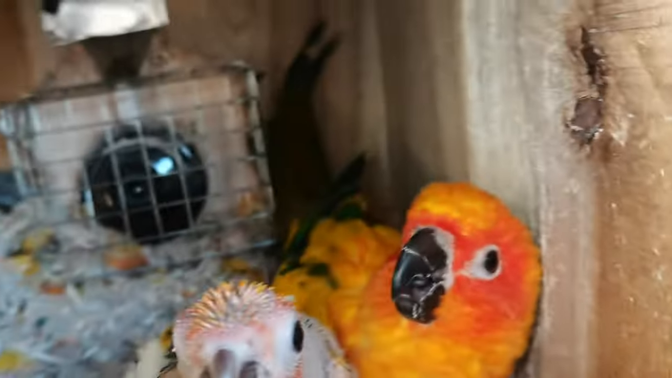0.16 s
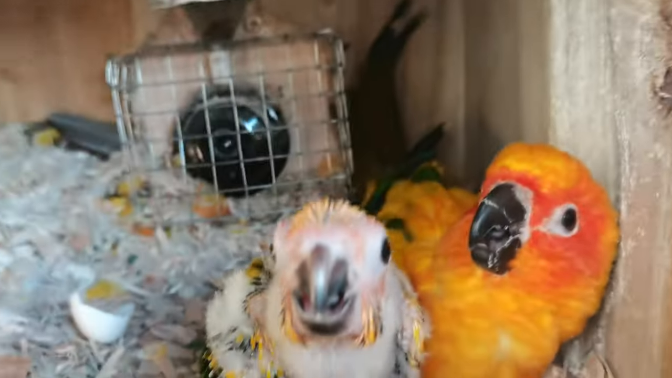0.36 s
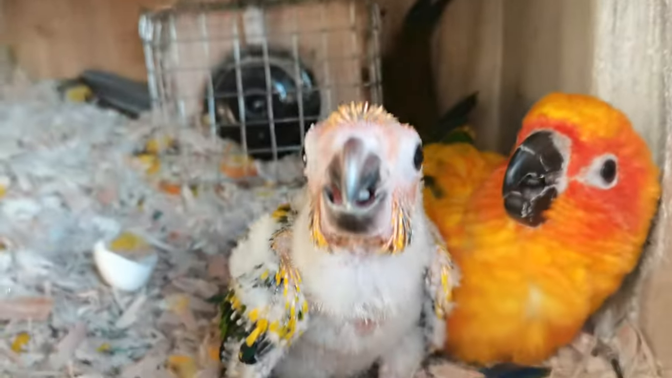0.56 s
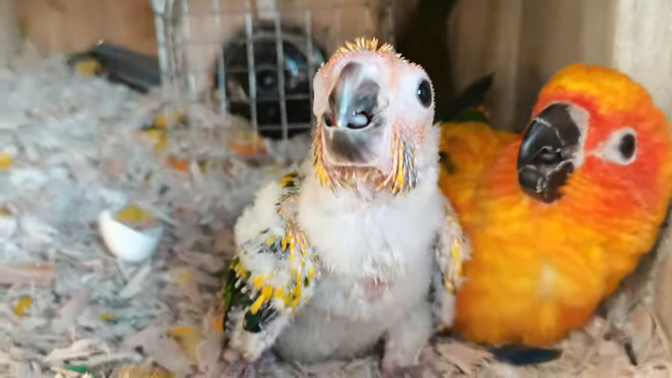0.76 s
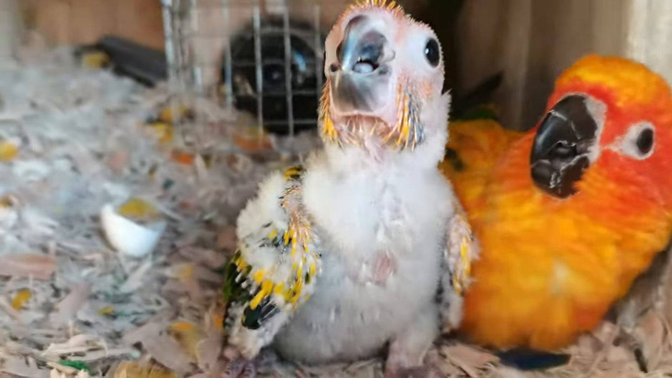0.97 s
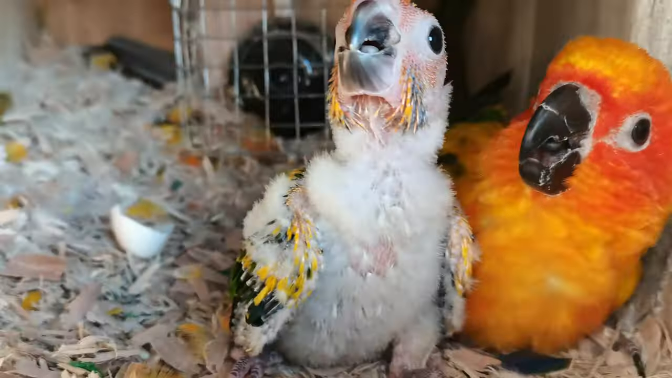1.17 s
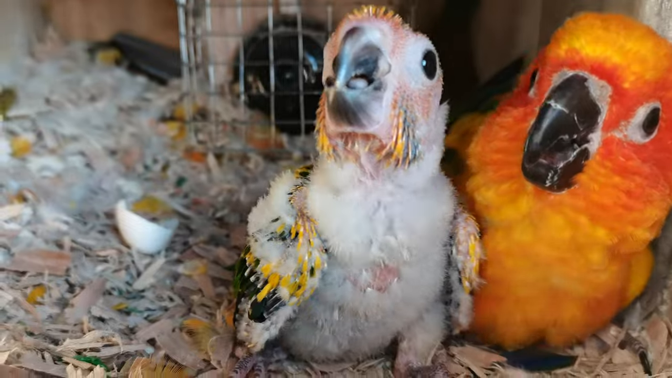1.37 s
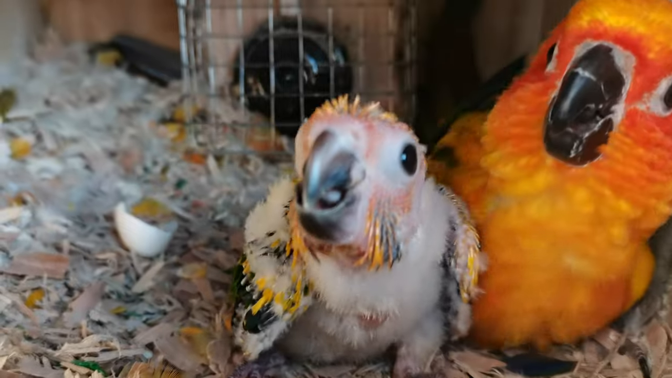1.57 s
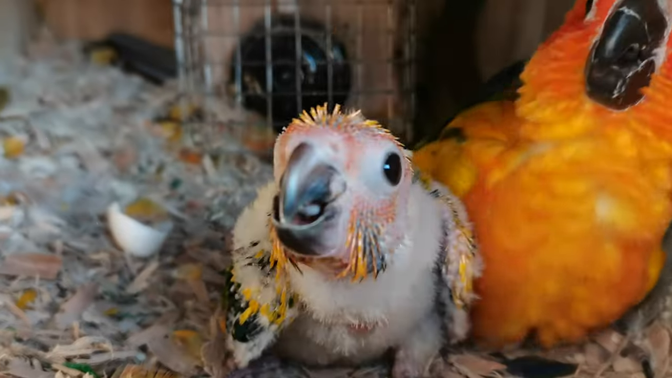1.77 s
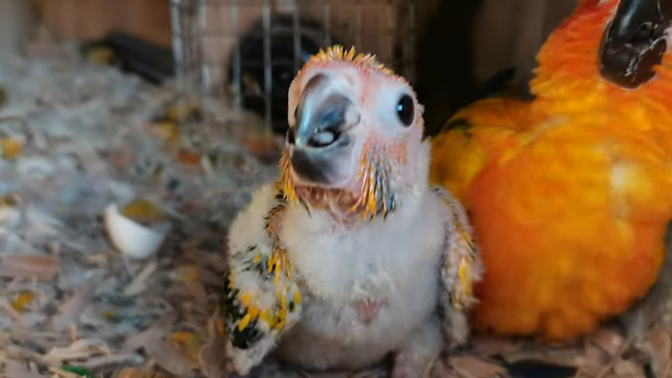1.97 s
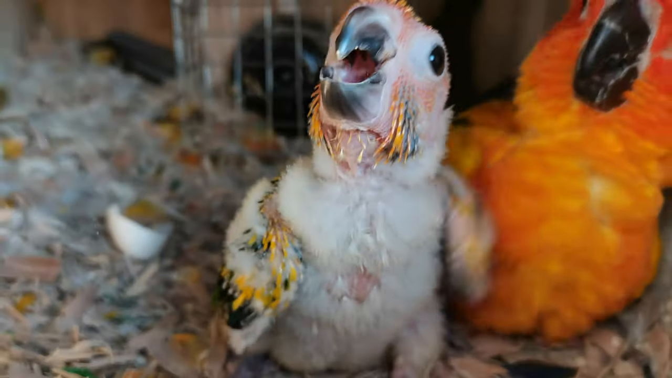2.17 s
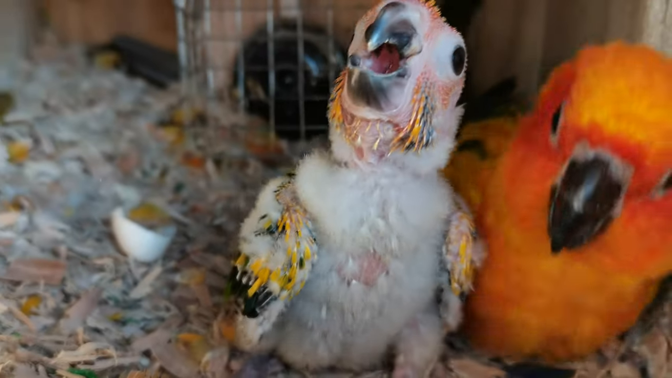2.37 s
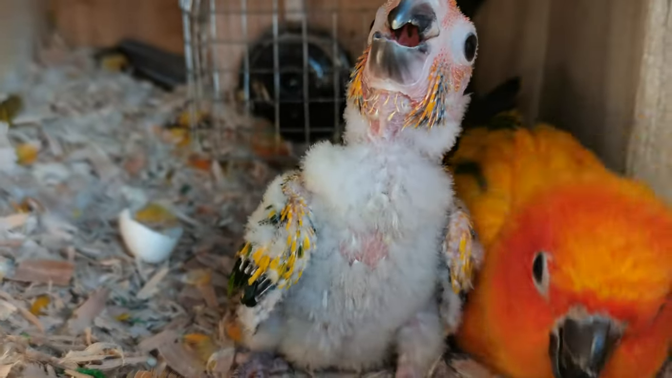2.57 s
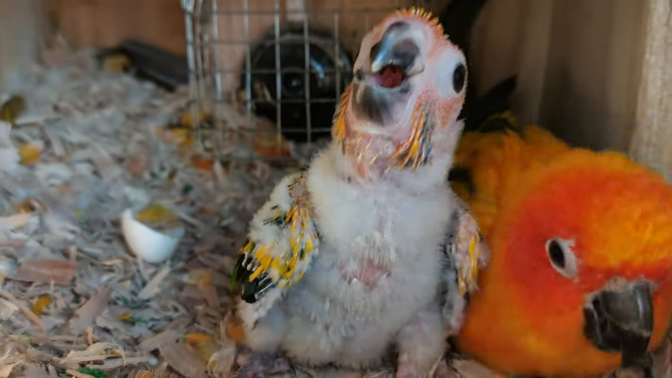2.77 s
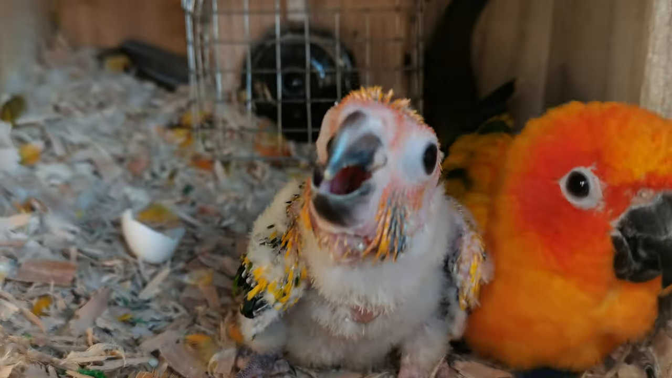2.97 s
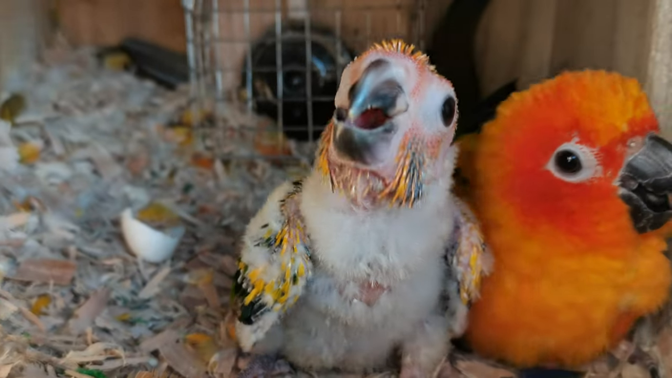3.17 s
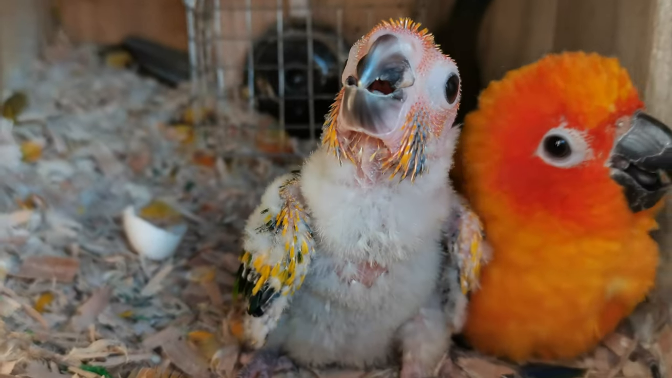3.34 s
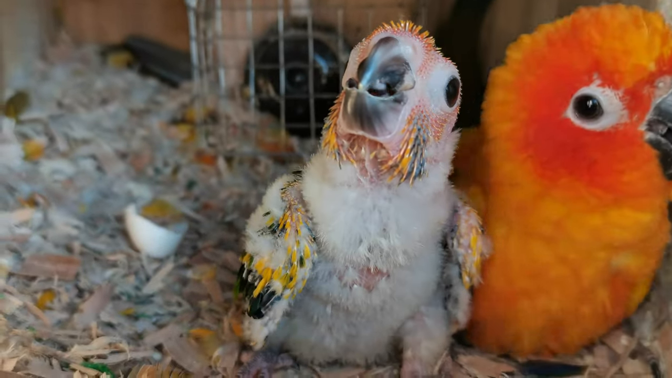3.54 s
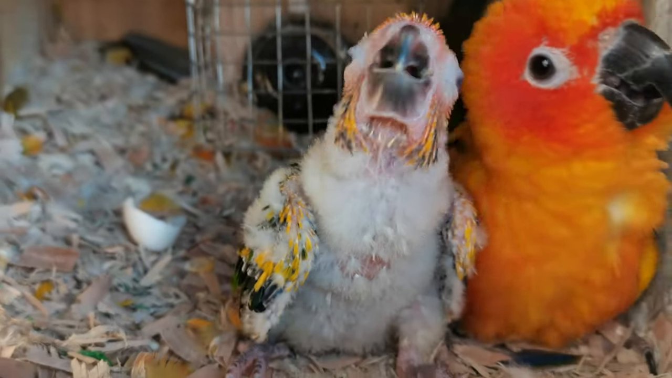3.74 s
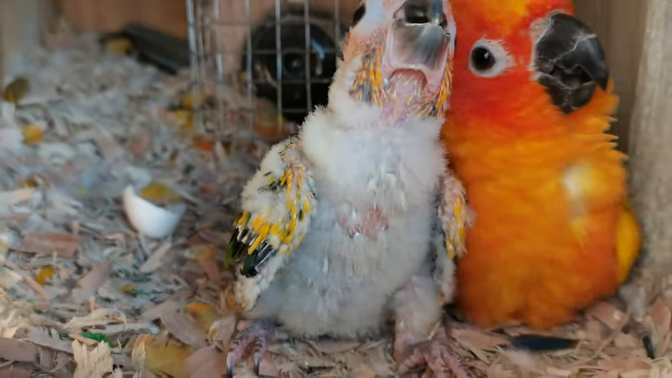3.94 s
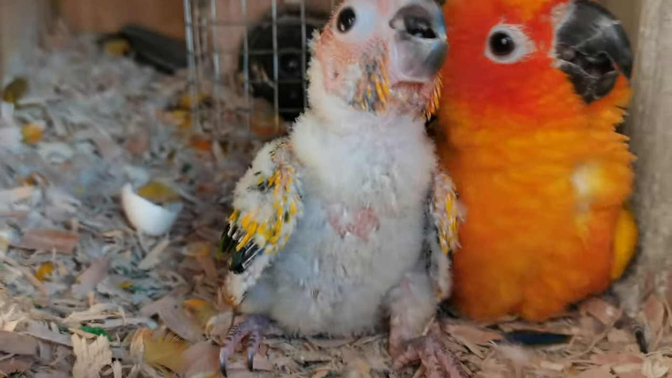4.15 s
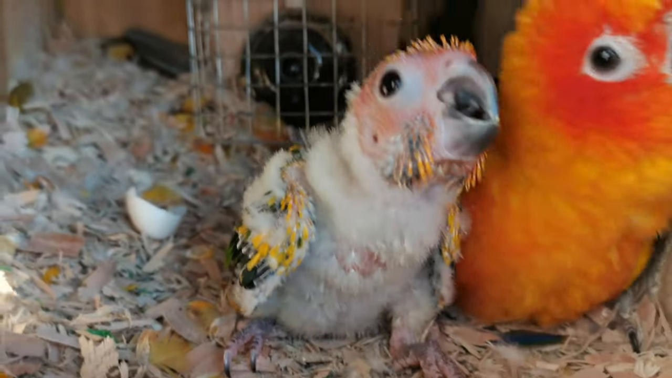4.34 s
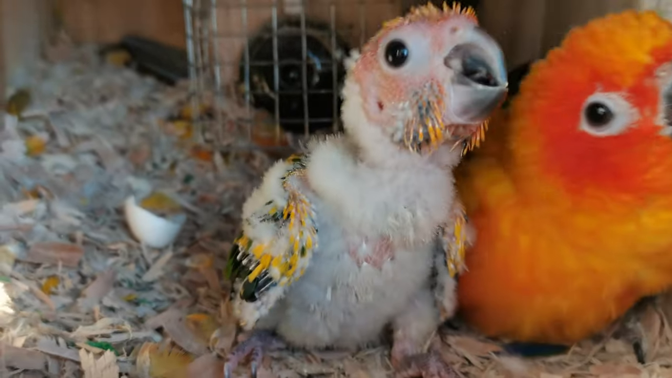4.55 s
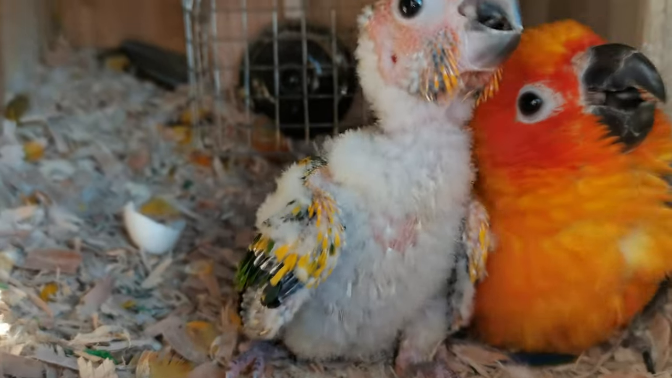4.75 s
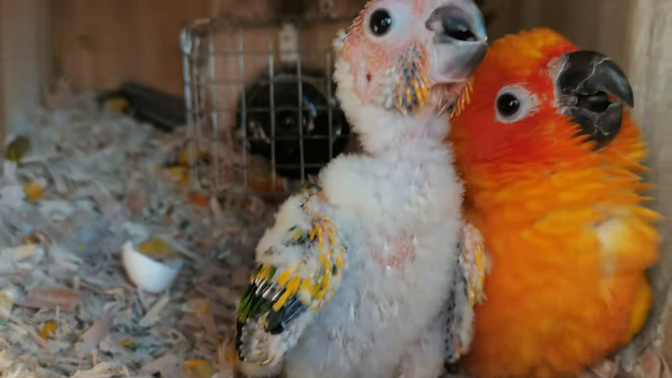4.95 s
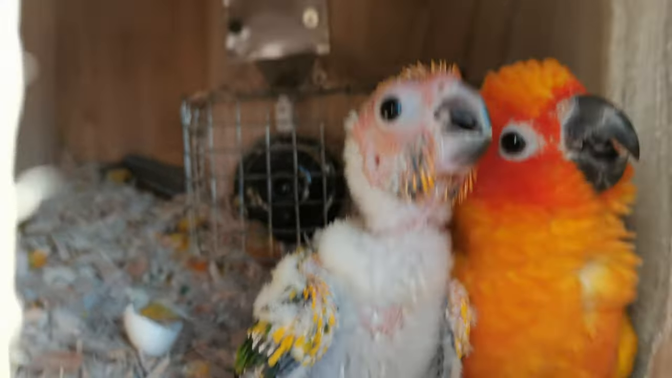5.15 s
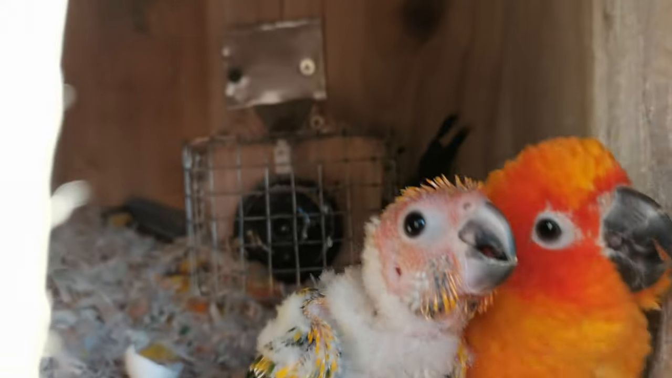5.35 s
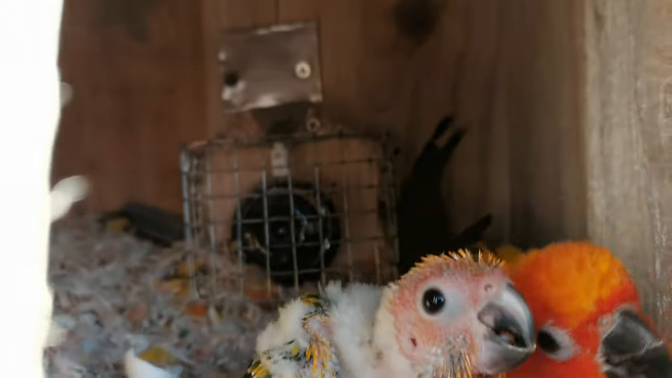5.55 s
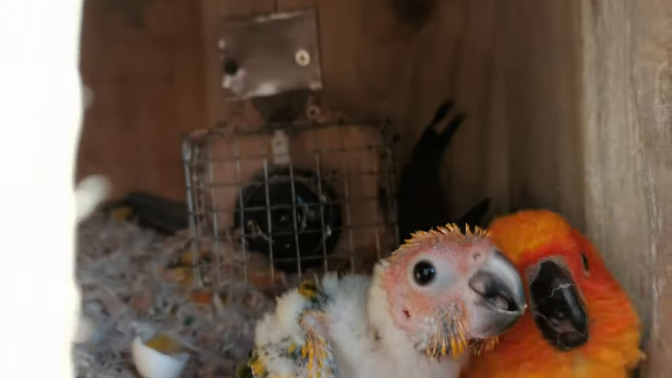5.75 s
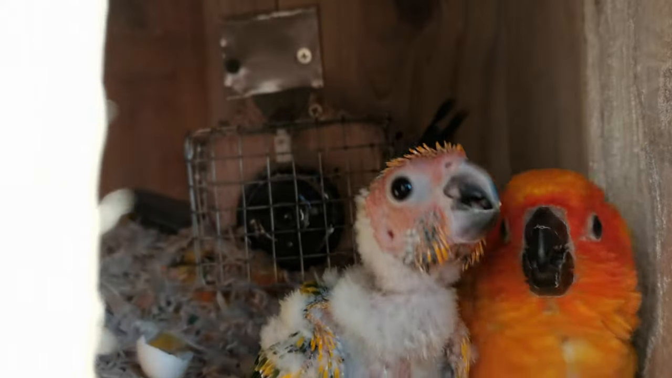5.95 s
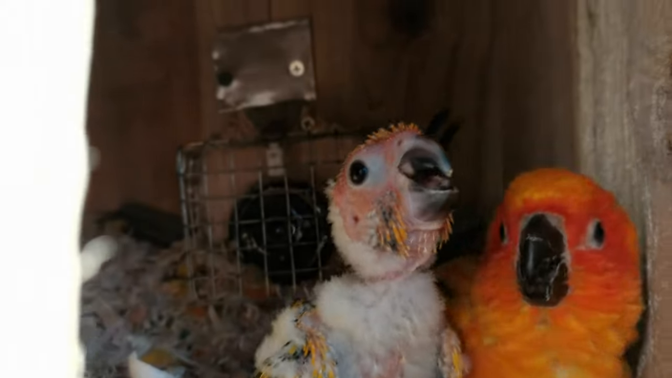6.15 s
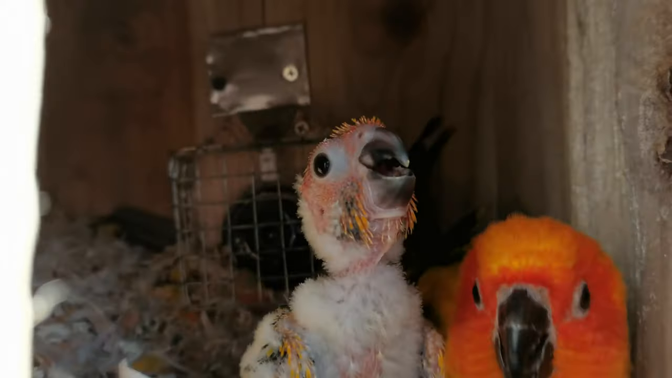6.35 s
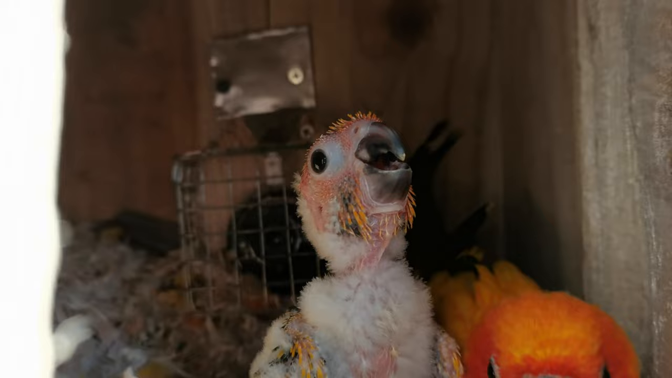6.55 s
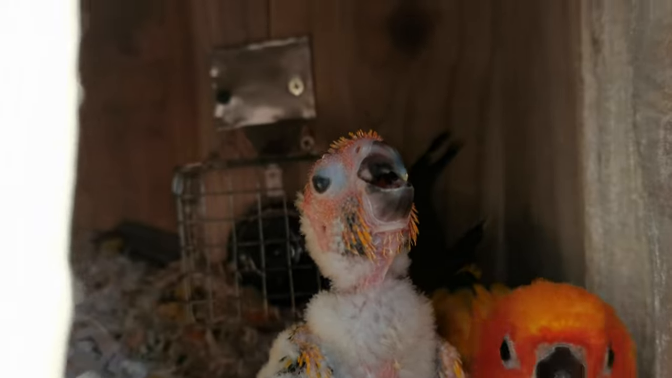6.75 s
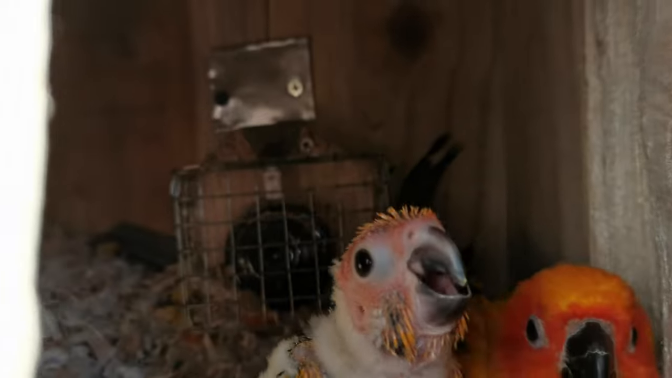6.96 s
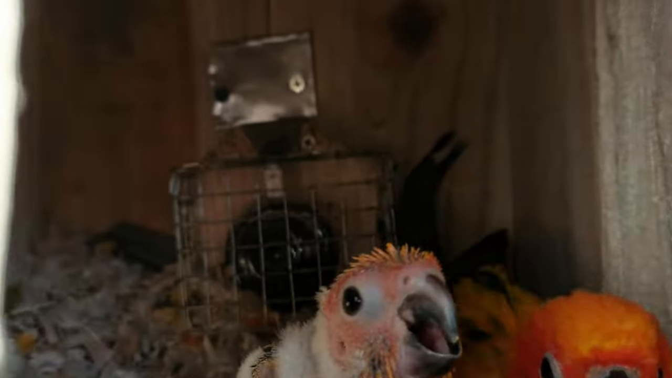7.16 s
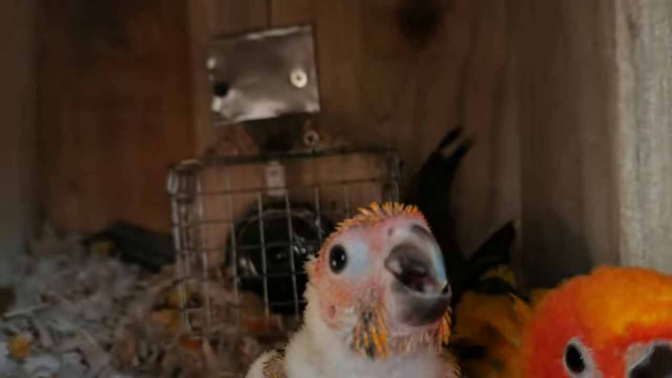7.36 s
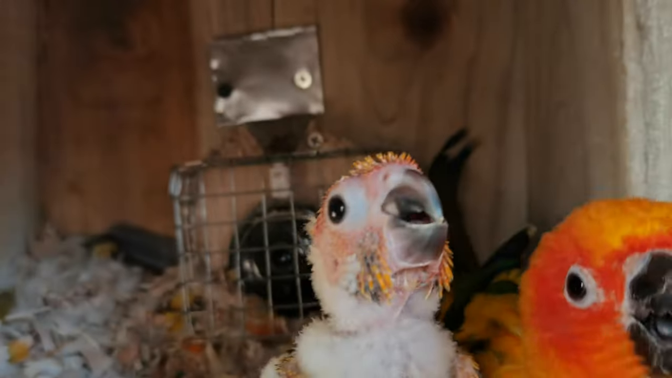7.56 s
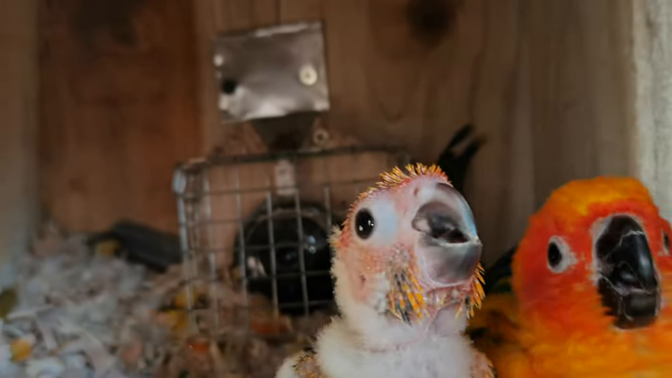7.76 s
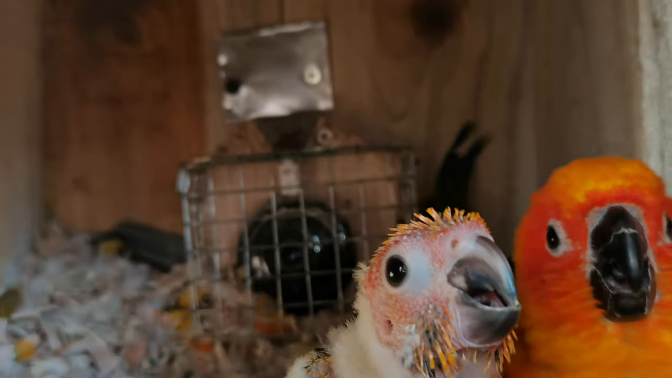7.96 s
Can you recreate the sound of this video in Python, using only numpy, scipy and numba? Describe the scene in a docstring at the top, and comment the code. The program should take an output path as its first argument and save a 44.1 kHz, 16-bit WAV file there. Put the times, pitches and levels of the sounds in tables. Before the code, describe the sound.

Parrots screech and whistle at a distance in an echoing aviary, over a faint low motor hum. Close to the microphone, inside a wooden nest box, a chick breaks into rapid, harsh begging rasps with a low rattling croak running through them. It pauses while the distant calls carry on, then begs a second time. Bedding rustles faintly and the birds knock lightly on the wood.

```python
"""Parrot chick begging in a nest box

A chick begs in two bouts of harsh rasps, thirteen a second: chaotic pulses of the syrinx excite the
resonances of throat and beak, and a low rattling croak runs through them. Other parrots screech and
whistle farther off in a reverberant aviary, and a distant motor hums, surging up from idle.
The birds shuffle in the bedding and knock lightly on the wooden box."""
import sys
import numpy as np
from scipy import signal
from scipy.fft import rfft, irfft, next_fast_len
from scipy.io import wavfile
from scipy.ndimage import uniform_filter1d, map_coordinates
from numba import njit

SR = 44100
rng = np.random.default_rng(int(sys.argv[2]) if len(sys.argv) > 2 else 0)


def to_wav(s):
    """Save 16-bit WAV."""
    ch = np.atleast_2d(s).T  # columns
    pcm = np.round(np.clip(ch, -1, 1) * 32767)  # PCM
    wavfile.write(sys.argv[1], SR, pcm.astype(np.int16))


N = 353682
TIME = np.arange(N) / SR
CUTOFF_HZ = 15700


def from_db(db):
    return 10 ** (np.asarray(db) / 20)


def rms_one(x):
    return x / np.sqrt(np.mean(x ** 2) + 1e-20)


def in_time(rows):
    """Linear interpolation of rows (time_s, values...) to every sample."""
    time_s, *columns = np.transpose(rows)
    return [np.interp(TIME, time_s, column) for column in columns]


def swell(middle_s, length_s):
    """Half-sine envelope, from 0 to 1 and back."""
    return np.cos(np.pi * np.clip((TIME - middle_s) / length_s, -.5, .5))


def drift(rate_hz, size=N):
    """Random modulation of unit rms, drawing rate_hz new values a second."""
    knots = rng.standard_normal(size // 4 + 2)
    return rms_one(np.interp(np.arange(size) * rate_hz / SR, np.arange(len(knots)), knots))


def add(track, start_s, sound):
    """Superposition of a sound on a track."""
    i = max(int(start_s * SR), 0)
    track[i:i + len(sound)] += sound[:max(N - i, 0)]


def partials(hz, rows):
    """Harmonic series on a moving pitch, from rows (harmonic, level_db); 0 dB is unit rms."""
    phase = 2 * np.pi * np.cumsum(hz) / SR
    return np.sqrt(2) * sum(from_db(db) * np.sin(round(order) * phase) for order, db in rows)


def coloured(x, points):
    """Spectral shaping by a curve through points (frequency_hz, gain_db)."""
    hz, db = np.transpose(points)
    size = next_fast_len(x.shape[-1] + 512)
    bins_hz = np.maximum(np.fft.rfftfreq(size, 1 / SR), 1)
    gain = from_db(np.interp(np.log(bins_hz), np.log(hz), db))
    return irfft(rfft(x, size) * gain, size)[..., :x.shape[-1]]


def butter(x, hz, kind, order=2):
    return signal.sosfilt(signal.butter(order, min(hz, .45 * SR), kind, fs=SR, output="sos"), x)


@njit
def two_pole(x, angle, radius):
    """Band-pass recursion with a moving pole angle."""
    y = np.zeros(len(x))
    for i in range(2, len(x)):
        drive = (1 - radius * radius) / 2 * (x[i] - x[i - 2])
        y[i] = drive + 2 * radius * np.cos(angle[i]) * y[i - 1] - radius * radius * y[i - 2]
    return y


def resonate(x, hz, width_hz):
    """Forced response of one damped mode."""
    angle = 2 * np.pi * hz / SR * np.ones(len(x))
    return two_pole(x + 1e-18, angle, np.exp(-np.pi * width_hz / SR))


def formant(x, hz, width_hz):
    """Two resonators in cascade give a peak with steep skirts; unit rms."""
    return rms_one(resonate(resonate(x, hz, width_hz), hz, width_hz))


def reverb(x, t60_s):
    """Diffuse field: an exponentially decaying tail of unit energy, different at each ear."""
    tail = rng.standard_normal((2, SR)) * from_db(-60 * TIME[:SR] / t60_s)
    tail /= np.sqrt(np.sum(tail ** 2, axis=1, keepdims=True))
    return signal.fftconvolve(np.atleast_2d(x), tail, axes=1)[:, :N]


def nest_box(left, right, lag_ms, wet_db, t60_s):
    """A path difference delays the right side; reflections between the boards ring briefly."""
    late_right = map_coordinates(right, [np.arange(N) - lag_ms * SR / 1000], order=3)
    direct = np.array([left, late_right])
    return direct + from_db(wet_db) * reverb(direct, t60_s)


def air(split_hz=350, rumble_right_db=-9, rumble_spread=0.44):
    """Ambient noise: a rumble largely coherent between the ears, under an incoherent rustle."""
    # outdoor noise spectrum: frequency_hz, density_db
    spectrum = [(25, -9.5), (55, -4), (82, -0.5), (104, -14), (125, -4.5), (200, -5.5), (320, -21),
                (750, -14), (1300, -4.5), (2300, -0.5), (4200, -5), (7500, -4), (9000, -15), (10300, -9),
                (15000, -29.5)]
    # background levels: time_s, rumble_db, rustle_db
    levels = [(0, -51, -50), (.7, -48.5, -49.5), (1.9, -46, -46.5), (3.2, -50, -46), (4.2, -53.5, -47.5),
              (5.05, -52, -51), (5.6, -51.5, -50.5), (6.5, -48.5, -43), (8, -54.5, -49)]
    rumble_db, rustle_db = in_time(levels)
    noise = coloured(rng.standard_normal((3, N)), spectrum)
    common, sides = noise[0], noise[1:]
    rumble = from_db(rumble_db) * rms_one(butter(common + rumble_spread * sides, split_hz, "low"))
    rustle = from_db(rustle_db) * rms_one(butter(sides, split_hz, "high", order=4))
    return rumble * from_db([[0], [rumble_right_db]]) + rustle


def bedding(rest_db=-67.5, crunch_db=1.5):
    """Friction noise: wood shavings crunch unevenly as the birds shuffle."""
    # spectrum of the shavings: frequency_hz, density_db
    spectrum = [(120, -23), (230, 10), (400, -7.5), (750, -0.5), (1100, 5.5), (1600, -9), (4000, -15),
                (12000, -71)]
    # movements of the birds: middle_s, length_s, level_db
    shuffles = [(0.39, 0.38, -52.5), (1.274, 5.15, -57.5), (4.982, 0.89, -62), (6.377, 0.7, -54),
                (7.808, 1.51, -59.5)]
    stirring = sum(from_db(db) * swell(middle_s, length_s) ** 2 for middle_s, length_s, db in shuffles)
    shavings = rms_one(coloured(rng.standard_normal((2, N)), spectrum))
    return shavings * (from_db(rest_db) + stirring) * from_db(crunch_db * drift(60))


def motor(idle_hz=140.7, waver=0.013, flutter_db=3.5, gain_db=1, right_db=-5, right_lag_rad=0.85):
    """Transmission loss: walls pass only the lowest two orders of a distant motor."""
    # surges up from idle and back: middle_s, length_s, top_hz
    surges = [(0.667, 0.39, 163.9), (1.273, 0.42, 167.2), (1.864, 0.35, 161.9), (2.452, 0.39, 168),
              (3.148, 0.9, 175.5), (3.661, 0.48, 174.1), (7.016, .66, 160.9)]
    # motor level: time_s, level_db
    levels = [(0, -41), (.4, -44.5), (1, -43), (2.1, -41.5), (2.55, -46), (3.1, -39.5), (3.45, -48),
              (3.67, -35.5), (4, -53), (4.5, -60.5), (6.02, -78), (6.2, -53.5), (6.6, -37), (7.15, -45),
              (7.5, -53), (8, -87)]
    rises_hz = [(top_hz - idle_hz) * swell(middle_s, length_s) for middle_s, length_s, top_hz in surges]
    hz = (idle_hz + np.max(rises_hz, axis=0)) * (1 + waver * drift(45))
    phase = 2 * np.pi * np.cumsum(hz) / SR - np.array([[0], [right_lag_rad]])
    tone = rms_one(np.sin(phase) + from_db(-38) * np.sin(2 * phase))
    level_db, = in_time(levels)
    return tone * from_db(level_db + gain_db + flutter_db * drift(25)) * from_db([[0], [right_db]])


def hum(pitch_hz=111, drone_hz=82, drone_db=-60, left_db=1, right_db=-8):
    """A nearly steady tone with its subharmonic and octave, over a drone of narrow-band noise."""
    # hum level: time_s, level_db
    level_db, = in_time([(0, -55), (.7, -50), (1.2, -47), (1.85, -44), (2.2, -62), (8, -55)])
    phase = 2 * np.pi * np.cumsum(pitch_hz * (1 + 0.0061 * drift(10))) / SR
    tone = rms_one(np.sin(phase) + from_db(-9) * np.sin(phase / 2) + from_db(-12.5) * np.sin(2 * phase))
    drone = from_db(drone_db) * formant(rng.standard_normal(N), drone_hz, width_hz=6.2)
    return (from_db(level_db) * tone + drone) * from_db([[left_db], [right_db]])


def whistle(length_s, first_hz, last_hz, waver=0.018):
    """A gliding sine, made wheezy by random frequency modulation."""
    size = int(length_s * SR)
    hz = np.linspace(first_hz, last_hz, size) * (1 + waver * drift(507, size))
    return rms_one(np.sin(2 * np.pi * np.cumsum(hz) / SR)) * signal.windows.tukey(size, .5)


def cry(length_s, pitch_hz, glide, rough, levels_db, arch=0.1187):
    """A shrill harmonic series; roughness unsettles the pitch and turns part of the power to noise."""
    # tone colour, with a dip near 9 kHz, a peak near 10 kHz, dull above 12 kHz: frequency_hz, gain_db
    colour = [(1500, -50), (2200, 3.5), (8200, 0), (9100, -10), (10100, 1), (11200, -9), (12500, -14),
              (14000, -36), (16000, -36)]
    progress = np.linspace(0, 1, int(length_s * SR))
    size = len(progress)
    jitter = (.016 + .075 * rough) * drift(1100, size)
    contour = 1 + glide * (progress - .5) + rough * arch * (np.sin(np.pi * progress) - .8)
    phase = 2 * np.pi * np.cumsum(pitch_hz * (contour + jitter)) / SR
    orders = np.arange(1, int(CUTOFF_HZ / pitch_hz) + 1)
    harmonic_db = np.array(levels_db)[np.minimum(orders, len(levels_db)) - 1]
    tone = np.sqrt(2) * from_db(harmonic_db) @ np.sin(np.outer(orders, phase))
    breath_spectrum = [(pitch_hz / 2, harmonic_db[0] - 15), *zip(orders * pitch_hz, harmonic_db)]
    breath = np.sqrt(SR / 2 / pitch_hz) * coloured(rng.standard_normal(size), breath_spectrum)
    breath_share = .08 + .72 * np.clip(rough, 0, 1) ** 2
    sound = coloured(np.sqrt(1 - breath_share) * tone + np.sqrt(breath_share) * breath, colour)
    # interference: each cry's own paths into the box favour some frequencies and cancel others
    grid_hz = np.arange(1000, 16000, 300)
    ripple_db = (1.5 + 3.5 * rough) * np.clip(rng.standard_normal(len(grid_hz)), -2, 1.3)
    rippled = coloured(sound, np.c_[grid_hz, ripple_db])
    return np.std(sound) * rms_one(rippled) * signal.windows.tukey(size, .7)


def far_parrots(cry_gain_db=0.5, whistle_gain_db=1.5, chatter_db=-55, late_db=-5, late_t60_s=0.64):
    """Reverberant field: cries, whistles and faint flock chatter arrive by reflection alone."""
    # shrill cries: start_s, length_s, pitch_hz, glide_ratio, roughness (0-1),
    # harmonic_1_db, harmonic_2_db, harmonic_3_db, higher_harmonics_db
    cries = [(0, 0.021, 2345, 0.017, 0.6, -46, -35, -39.5, -42.5),
             (0.057, 0.051, 2516, 0.048, 0.35, -41.5, -35.5, -40, -35),
             (0.158, 0.048, 2638, 0.12, 0.37, -41, -33.5, -41.5, -38),
             (0.419, 0.08, 3465, 0.053, 0.48, -38, -39, -41, -63),
             (0.501, 0.047, 2390, -0.043, 1, -43.5, -38.5, -41, -48),
             (0.537, 0.049, 3924, 0.0074, 0.62, -28, -35.5, -36, -63),
             (0.63, 0.047, 2820, 0, 0.9, -61, -31, -53, -31.5),
             (0.728, 0.047, 2485, 0.022, 0.74, -45.5, -36, -47, -37),
             (0.811, 0.038, 2175, 0.043, 0.7, -52, -32.5, -42.5, -36),
             (0.912, 0.039, 2137, -0.03, 0.97, -54, -30.5, -47.5, -41),
             (1.062, 0.034, 2147, 0.056, 0.46, -58, -32.5, -59, -42),
             (1.132, 0.044, 2160, -0.011, 0.47, -67, -33, -51, -41.5),
             (1.238, 0.033, 2086, 0.0025, 0.087, -40.5, -42, -45.5, -43.5),
             (1.372, 0.04, 1964, -0.02, 0.17, -45, -39.5, -67, -61),
             (1.644, 0.061, 2340, 0, 0.99, -52, -43, -47, -47),
             (1.75, 0.072, 2070, -0.0055, 0.39, -67, -35.5, -52, -39),
             (1.829, 0.053, 2370, -0.054, 0.96, -42.5, -47, -46, -57),
             (3.08, 0.072, 2540, -0.027, 0.92, -42, -39, -46, -45),
             (3.29, 0.097, 2120, -0.027, 0.64, -49, -36.5, -43, -43.5),
             (3.493, 0.078, 2060, 0.035, 0.91, -44.5, -34.5, -37.5, -38.5),
             (3.559, 0.065, 2076, 0.017, 1, -40.5, -32, -37, -39.5),
             (3.67, 0.066, 3070, -0.0052, 0.57, -65, -43.5, -63, -63),
             (3.734, 0.063, 2007, 0.004, 0.37, -43, -51, -37.5, -46.5),
             (3.87, 0.099, 2740, -0.018, 0.32, -52, -46.5, -57, -43.5),
             (3.964, 0.056, 2530, -0.028, 0.39, -54, -46, -44, -47),
             (4.024, 0.076, 2050, -0.0041, 0.79, -52, -43, -42.5, -47.5),
             (4.16, 0.078, 2797, 0.069, 1, -38.5, -33, -35.5, -32),
             (4.259, 0.093, 2080, -0.013, 0.9, -53, -45, -44, -41.5),
             (4.377, 0.066, 2650, 0.061, 0.56, -37.5, -33, -36.5, -28),
             (4.44, 0.085, 2210, -0.03, 0.72, -58, -40.5, -55, -61),
             (4.533, 0.056, 2630, 0.05, 0.18, -41.5, -35, -38.5, -33.5),
             (4.657, 0.055, 2516, 0.019, 0.4, -39.5, -32.5, -39, -33.5),
             (4.745, 0.066, 2617, 0.00043, 0.17, -44, -47.5, -56, -48),
             (4.8, 0.055, 3010, -0.0012, 0.093, -48, -53, -61, -43),
             (4.915, 0.075, 4040, 0.015, 0.03, -51, -53, -67, -46),
             (5.098, 0.069, 2350, -0.011, 0.57, -49.5, -47, -49, -56),
             (5.165, 0.0593, 2546, -0.018, 0.506, -49, -44.5, -37, -43.5),
             (5.387, 0.059, 2195, -0.043, 0.52, -49, -61, -40.5, -49),
             (5.69, 0.1, 2453, -0.026, 0.66, -56, -35, -46, -36.5),
             (5.744, 0.07, 3210, 0.012, 0.94, -51, -36, -52, -62),
             (5.805, 0.1, 3250, 0, 1, -35, -34.5, -33.5, -44),
             (5.9, 0.13, 3150, -0.031, 0.98, -36.5, -37, -42, -40),
             (6.309, 0.068, 2857, -0.0048, 0.81, -43, -33, -42, -35),
             (6.47, 0.083, 2727, -0.057, 0.68, -40, -30.5, -39, -30.5),
             (6.56, 0.076, 2613, -0.014, 0.49, -38, -30.5, -43, -30.5),
             (6.641, 0.062, 2500, 0, 0.47, -57, -51, -52, -55),
             (7.382, 0.06, 2550, -0.033, 0.41, -43.5, -40, -37.5, -44),
             (7.452, 0.086, 2470, -0.0038, 0.73, -46, -34.5, -45, -36.5),
             (7.53, 0.084, 3710, -0.047, 0.39, -44, -38.5, -39, -63),
             (7.62, 0.11, 2144, -0.055, 0.6, -54, -41, -51, -50.5)]
    # thin whistles: start_s, length_s, first_hz, last_hz, level_db
    whistles = [(0.597, 0.037, 3990, 4080, -33.5), (0.649, 0.044, 4480, 4630, -34),
                (.745, 0.04, 4740, 4770, -46), (0.834, 0.048, 4320, 4240, -39),
                (0.955, 0.044, 4530, 4440, -37.5), (1.01, 0.031, 4390, 4310, -37),
                (1.069, 0.11, 4400, 4330, -43), (1.157, 0.045, 4236, 4260, -35),
                (1.255, 0.052, 4260, 4090, -43), (1.37, 0.037, 3910, 3830, -42),
                (3.746, 0.073, 6020, 6050, -48), (3.969, 0.081, 4620, 4230, -42.5),
                (4.049, 0.19, 4260, 3930, -45), (4.198, .15, 4500, 4410, -43),
                (4.189, 0.081, 2374, 2250, -47), (4.2, 0.044, 5930, 5980, -34.5),
                (4.404, 0.066, 6280, 6190, -32.5), (4.555, .08, 5900, 6170, -40),
                (4.67, 0.066, 5100, 4950, -42), (4.804, 0.037, 6050, 6030, -44),
                (4.826, .26, 2217, 1377, -54), (5.034, 0.084, 8200, 7930, -57),
                (5.179, 0.07, 4420, 4360, -38), (5.203, 0.066, 3990, 3920, -41.5),
                (5.296, 0.17, 4530, 4550, -50), (5.572, 0.04, 6430, 6480, -44.5),
                (5.798, 0.18, 4285, 4005, -38), (5.83, 0.16, 1970, 1410, -52.5),
                (6.706, 0.18, 4110, 4077, -43), (7.478, 0.083, 4840, 4690, -46),
                (7.532, 0.092, 3090, 2765, -45.5), (7.618, 0.063, 4800, 4320, -46),
                (7.663, 0.13, 4310, 3980, -43)]
    calls = np.zeros(N)
    for start_s, length_s, pitch_hz, glide, rough, *levels_db in cries:
        add(calls, start_s, from_db(cry_gain_db) * cry(length_s, pitch_hz, glide, rough, levels_db))
    for start_s, length_s, first_hz, last_hz, level_db in whistles:
        add(calls, start_s, from_db(level_db + whistle_gain_db) * whistle(length_s, first_hz, last_hz))
    for when, length, height, fall in rng.random(size=(60, 4)):
        pitch_hz = 1200 + 1400 * height
        chatter = whistle(.04 + .06 * length, pitch_hz, pitch_hz * (1 - .2 * fall), waver=.05)
        add(calls, when * N / SR, from_db(chatter_db) * chatter)
    early = .8 * reverb(calls, t60_s=.12) + .55 * reverb(calls, t60_s=.35)
    return early + from_db(late_db) * reverb(calls, late_t60_s)


def knocks(gain_db=30):
    """Impacts excite the modes of the boards: soft contacts thud, bright ones tick."""
    # contacts with the box: start_s, level_db, brightness_hz
    contacts = [(0.307, -26, 205), (0.331, -27, 251), (0.358, -60, 582), (0.385, -31, 300),
                (0.426, -50, 1500), (4.9493, -28.5, 1770), (7.958, -33.5, 2997)]
    # modes of the boards: frequency_hz, width_hz, gain_db
    board_modes = [(228, 60, 10.5), (458, 120, -0.5), (1130, 1100, -13), (1880, 600, 0)]
    force = np.zeros(N)
    for start_s, level_db, brightness_hz in contacts:
        push = butter(signal.unit_impulse(SR // 50), brightness_hz, "low", order=3)
        tap = butter(push, brightness_hz / 3, "high", order=1)
        add(force, start_s, from_db(level_db + gain_db) * tap)
    wood = sum(from_db(db) * resonate(force, hz, width_hz) for hz, width_hz, db in board_modes)
    return nest_box(wood, wood, lag_ms=.05, wet_db=-5, t60_s=.12)


def croak(pulse_s=0.007, glide=0.12, scatter=0.031, jitter=.13, rough=0.72, taut_hz=863):
    """Source and filter: each pulse of a slow rattle is a few rough cycles that ring the throat."""
    # runs of pulses: first_s, count, spacing_s, slowing_s (per pulse)
    runs = [(2.259, 6, .0199, 0), (2.3803, 39, .0214, .00004), (3.267, 3, .0196, 0), (3.362, 11, .0062, 0),
            (6.271, 2, .0213, 0), (6.339, 2, .02, 0), (6.414, 1, 0, 0), (6.52, 2, .03, 0),
            (6.7225, 20, .02155, 0), (7.155, 11, .0229, .00012)]
    # vocal effort: time_s, level_db, overtone_db, pitch_hz
    effort = [(2.26, -46, 7, 634), (2.33, -32, -5, 687), (2.47, -27.5, -1, 830), (3.05, -28.5, 4.5, 1049),
              (3.28, -29.5, 2, 927), (3.36, -38.5, -2, 927), (3.42, -32, 3, 905), (6.27, -42, -14, 884),
              (6.42, -35.5, -14, 857), (6.55, -33, -14, 880), (6.74, -31.5, -3, 1014), (6.88, -24, -5, 928),
              (7.16, -25, -2, 894), (7.39, -32, -29, 892)]
    # main resonance of the throat: frequency_hz, gain_db
    root_response = [(300, -37), (450, -18), (600, -13), (780, 1), (900, 5), (1150, 4), (1450, -3.5),
                     (2000, -16), (3000, -50)]
    # upper resonances of the throat: frequency_hz, gain_db
    upper_response = [(1000, -36), (1500, -13), (1950, 8.5), (2400, 0.5), (2850, 5), (3300, 0),
                      (3800, 11.5), (4600, 6.5), (5400, -10), (7800, -2.5), (9500, -23), (15000, -46)]
    level_db, overtone_db, pitch_hz = in_time(effort)
    root, overtones = np.zeros((2, N))
    progress = np.linspace(0, 1, int(pulse_s * SR))
    envelope = np.sin(np.pi * progress ** .8) ** 2
    starts_s = [first_s + k * spacing_s + k * k * slowing_s / 2
                for first_s, count, spacing_s, slowing_s in runs for k in range(count)]
    for start_s in starts_s:
        centre_hz = pitch_hz[int(start_s * SR)]
        contour = 1 + scatter * rng.normal() + glide * (progress - .5)
        hz = centre_hz * (contour + jitter * drift(1200, len(progress)))
        cycles = np.cumsum(hz) / SR + rng.random()
        buzz = rms_one(np.diff(np.floor(cycles), prepend=0))
        pulse = envelope * (buzz + rough * rng.standard_normal(len(progress)))
        tautness = min(centre_hz / taut_hz, 1)   # a slack throat rings lower
        add(root, start_s, rms_one(coloured(pulse, np.array(root_response) * [tautness, 1])))
        add(overtones, start_s, rms_one(coloured(pulse, upper_response)))
    root *= from_db(level_db)
    overtones *= from_db(level_db + overtone_db + 1)
    right = root * from_db(-4) + overtones * from_db(-9)
    return nest_box(root + overtones, right, lag_ms=0.043, wet_db=-3.5, t60_s=0.05)


def squeaks(jitter=0.028):
    """Nearly periodic vibration: as a bout begins, a clear pitch glides, strongest at the octave."""
    # squeaks: start_s, length_s, first_hz, last_hz, level_db, fundamental_db, right_db
    notes = [(2.01, 0.016, 1615, 1840, -26.5, -25, -8), (2.105, 0.012, 2174, 2230, -13.5, -13, -12),
             (2.245, 0.012, 2210, 2160, -14.5, -17, -18), (5.981, 0.017, 1440, 2000, -36, -4, -1),
             (5.997, 0.034, 2174, 1536, -26, -11, -1)]
    # overtones of a squeak: harmonic, level_db
    overtones = [(2, -0.5), (3, -15), (4, -28), (5, -22)]
    left, right = np.zeros((2, N))
    for start_s, length_s, first_hz, last_hz, level_db, fundamental_db, right_db in notes:
        size = int(length_s * SR)
        hz = np.linspace(first_hz, last_hz, size) * (1 + jitter * drift(1160, size))
        tone = partials(hz, [(1, fundamental_db), *overtones])
        note = from_db(level_db) * tone * signal.windows.tukey(size, .5)
        add(left, start_s, note)
        add(right, start_s, note * from_db(right_db))
    return nest_box(left, right, lag_ms=.09, wet_db=-7, t60_s=.044)


def throat(cycles, main_hz, lower_db, rest_hz=4174, lower_below_hz=3500, breath=0.73):
    """Formant filtering: syrinx flaps and breath ring modes that shift together; the level is even."""
    # modes of the throat at rest: frequency_hz, width_hz, gain_db, right_db
    modes = [(986, 328, -16.5, 3), (2237, 390, -7, 1.5), (3020, 970, -4, 3.5), (3293, 447, 4, -23),
             (3655, 380, 6, -1.5), (4113, 353, 11.5, -1.5), (4550, 230, -6.5, -2)]
    flaps = rms_one(np.diff(np.floor(cycles), prepend=0)) + breath * rng.standard_normal(N)
    sides = np.zeros((2, N))
    for hz, width_hz, gain_db, right_db in modes:
        strength_db = gain_db + lower_db * (hz < lower_below_hz) + 2 * drift(50)
        mode = from_db(strength_db) * formant(flaps, hz * main_hz / rest_hz, width_hz)
        sides += mode * from_db([[0], [right_db]])
    return sides / np.sqrt(uniform_filter1d(sides[0] ** 2, size=160) + 1e-9)


def rasp_hiss(cycles, beak_hz):
    """Pulsed turbulence: a puff of air escapes with every flap, hisses and rings the open beak."""
    # spectrum of the hiss: frequency_hz, density_db
    spectrum = [(400, -56), (850, -2), (1400, 6.5), (2500, -32), (5200, 5), (6800, 8.5), (8000, 13),
                (8900, 7.5), (9900, 4.5), (11200, 5.5), (12000, -18), (13000, -26), (14600, -9),
                (16000, -44)]
    # modes of the beak: ratio (to beak_hz), width_hz, gain_db
    modes = [(0.681, 2490, 7.5), (1, 784, 6.5), (1.08, 780, -8.5), (1.49, 430, -11.5)]
    puffs = np.exp(-1.6 * (cycles % 1)) * rng.standard_normal((2, N))
    ring = np.zeros((2, N))
    for ratio, width_hz, gain_db in modes:
        ring += from_db(gain_db) * np.array([formant(side, ratio * beak_hz, width_hz) for side in puffs])
    return (rms_one(coloured(puffs, spectrum)) + rms_one(ring)) / np.sqrt(2)


def chick(flap_hz=820, flap_jitter=.2, tone_jitter=.056, flutter_db=4, arch=0.091, chip_s=0.0056):
    """Chaotic oscillation of the syrinx around an unsteady tone; each rasp swells as the beak opens."""
    # begging rasps: middle_s, length_s, level_db, throat_hz, pitch_hz, tone_db
    rasps = [(2.129, 0.049, -22, 4250, 2208, -3), (2.192, 0.058, -16, 4440, 2370, -1.5),
             (2.273, 0.044, -15.5, 4480, 2370, -1), (2.347, 0.066, -14.5, 4430, 2320, -6),
             (2.425, 0.057, -12.5, 4370, 2320, -5.5), (2.503, 0.051, -12, 4417, 2300, -7.5),
             (2.584, 0.05, -12.5, 4230, 2280, -11), (2.662, 0.049, -13.5, 4150, 2293, -11),
             (2.74, 0.046, -12, 4160, 2246, -7.5), (2.82, .05, -13, 4280, 2230, -11),
             (2.899, 0.05, -13.5, 4120, 2214, -8.5), (2.981, 0.044, -9, 4155, 2235, -8.5),
             (3.064, 0.046, -13, 4190, 2260, -6), (6.081, .038, -21.5, 4040, 2120, -6),
             (6.152, 0.055, -22, 3980, 2062, -4), (6.227, 0.049, -20.5, 3960, 2010, -3.5),
             (6.307, 0.048, -21, 3740, 1976, -2.5), (6.382, 0.051, -21, 3780, 1998, -3),
             (6.46, 0.049, -16.5, 3760, 2030, -7.5), (6.536, 0.046, -16.5, 3726, 2017, -5.5),
             (6.614, 0.056, -17, 3840, 2020, -5), (6.695, 0.046, -15.5, 3770, 1980, -5.5),
             (6.772, 0.053, -15, 3880, 2020, -10), (6.847, 0.053, -17.5, 3900, 2030, -8),
             (6.923, 0.047, -13, 4076, 2136, -5), (6.999, 0.046, -12, 4220, 2218, -9),
             (7.073, 0.0476, -11, 4190, 2200, -9), (7.154, 0.04, -10, 4320, 2220, -13.5),
             (7.246, 0.05, -15.5, 4130, 2130, -23)]
    # ringing tone inside a rasp: harmonic, level_db
    harmonics = [(1, -5.5), (2, -12.5), (3, -19)]
    # turning of head and beak: time_s, right_db, hiss_db, lower_modes_db, beak_hz
    posture = [(2.12, -13, -16, -2.5, 10160), (2.19, -11, -12, -1.5, 10500),
               (2.34, -12, -13.5, -1.5, 10180), (2.56, -11, -15, 6, 9800), (2.66, -8, -17.5, 3.5, 9590),
               (2.82, -12, -17.5, 2.5, 9830), (3.06, -12, -15.5, -6, 9880), (6.08, -1.5, -11.5, 2, 9640),
               (6.38, 0, -11, 3, 9700), (6.53, -0.5, -10, -6.5, 9830), (6.84, -1, -8.5, -0.5, 9800),
               (6.99, -2.5, -15, -1.5, 10160), (7.15, -6, -13.5, -0.5, 10490),
               (7.245, -8, -14.5, 0.5, 10370)]
    # dry chips where the voice catches: start_s, level_db
    chips = [(2.031, -24.5), (2.049, -40), (2.066, -34), (2.093, -21.5), (2.106, -18), (2.167, -26),
             (2.2477, -22), (2.33, -23), (2.798, -24), (3.043, -20), (6.006, -23), (6.066, -26.5),
             (6.674, -23), (6.986, -15), (7.228, -20)]
    right_db, hiss_db, lower_modes_db, beak_hz = in_time(posture)
    _, _, throat_hz, pitch_hz, _ = in_time(rasps)
    voice_gain, tone_gain, hiss_gain, bend = np.zeros((4, N))
    for middle_s, length_s, level_db, _, _, tone_db in rasps:
        start_s = middle_s - length_s / 2
        progress = np.linspace(0, 1, int(length_s * SR))
        ramp = np.minimum(progress / 0.49, (1 - progress) / 0.58)
        opening = np.sin(np.pi / 2 * np.clip(ramp, 0, 1))
        add(voice_gain, start_s, from_db(level_db - 2.5) * rms_one(opening))
        add(tone_gain, start_s, from_db(level_db + tone_db - 3) * rms_one(opening))
        hiss_level_db = level_db + hiss_db[int(middle_s * SR)] - 3.5
        add(hiss_gain, start_s, from_db(hiss_level_db) * rms_one(opening ** 1.6))
        # pitch and resonances arch, differently in every rasp
        height, slant = rng.standard_normal(2)
        contour = (1 + .25 * height) * (np.sin(np.pi * progress) - .85) + .3 * slant * (progress - .5)
        add(bend, start_s, arch * contour)
    chip = rms_one(np.hanning(int(chip_s * SR)))
    for start_s, level_db in chips:
        add(voice_gain, start_s, from_db(level_db) * chip)
        add(hiss_gain, start_s, from_db(level_db - 12.5) * chip)
    cycles = np.cumsum(flap_hz * np.exp(flap_jitter * drift(900))) / SR
    voice = voice_gain * throat(cycles, throat_hz * (1 + bend), lower_modes_db)
    # the syrinx saturates, so the rasp flutters only within limits
    flutter = rms_one(from_db(flutter_db * np.tanh(drift(300))))
    tone = tone_gain * partials(pitch_hz * (1 + bend) * (1 + tone_jitter * drift(1100)), harmonics)
    hiss = hiss_gain * rasp_hiss(cycles, beak_hz * (1 + bend / 2))
    left = flutter * (voice[0] + tone + hiss[0])
    right = flutter * ((voice[1] + tone) * from_db(right_db) + hiss[1] * from_db(-0.5))
    return nest_box(left, right, lag_ms=0.093, wet_db=-4, t60_s=0.035)


def scene():
    """Superposition of the chick's voice and its surroundings, in stereo."""
    return chick() + squeaks() + croak() + far_parrots() + motor() + hum() + knocks() + air() + bedding()


def record(dry):
    """Soft saturation rounds the loudest peaks; a steep low-pass cuts the highest treble."""
    low_pass = signal.cheby2(14, 70, CUTOFF_HZ * 1.04, fs=SR, output="sos")
    return signal.sosfilt(low_pass, 1.05 * np.tanh(dry / 1.05))


dry = scene()
out = record(dry)
to_wav(out)
```